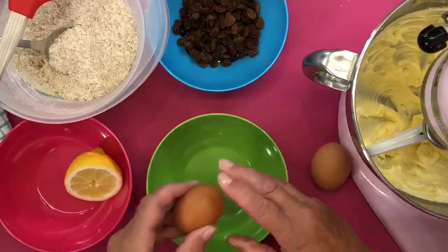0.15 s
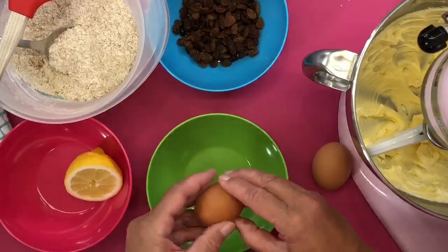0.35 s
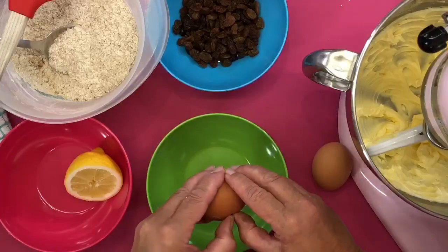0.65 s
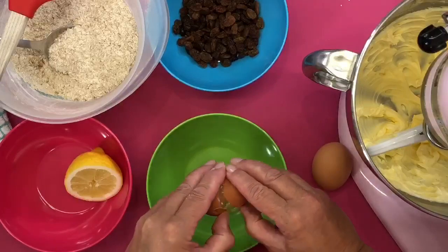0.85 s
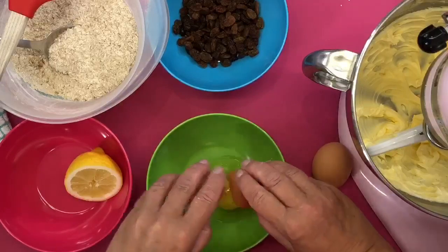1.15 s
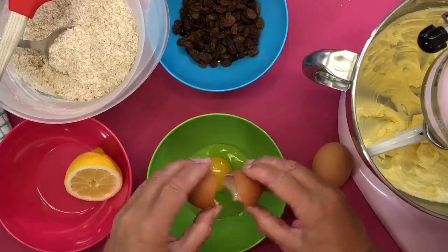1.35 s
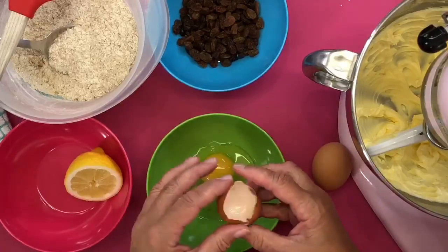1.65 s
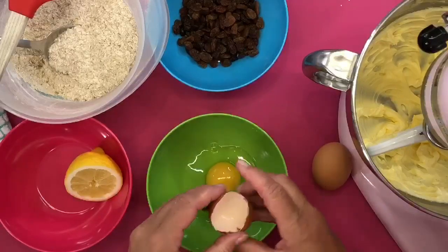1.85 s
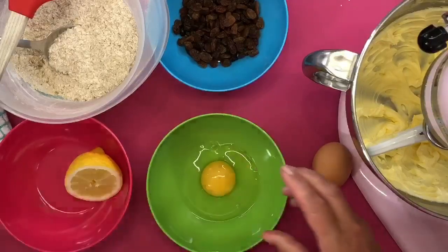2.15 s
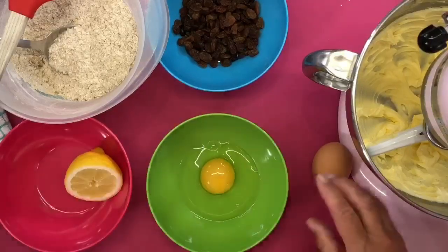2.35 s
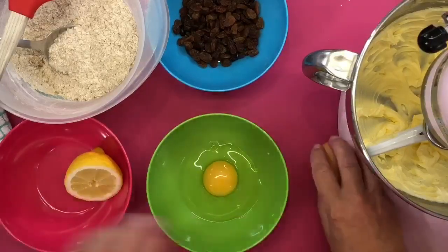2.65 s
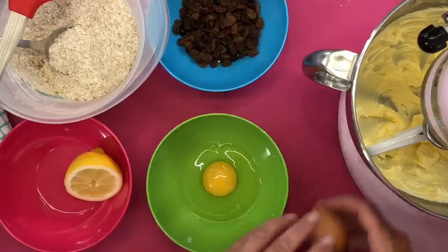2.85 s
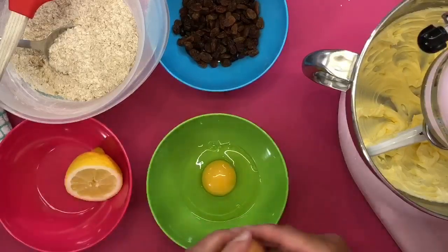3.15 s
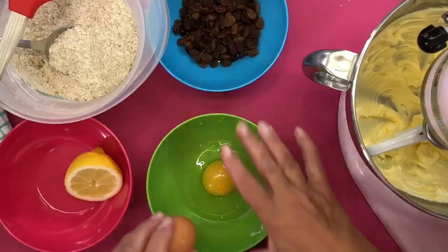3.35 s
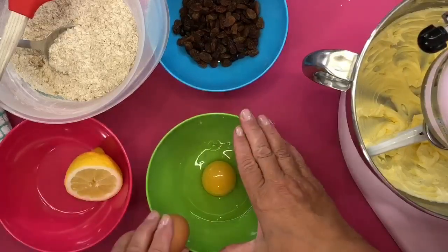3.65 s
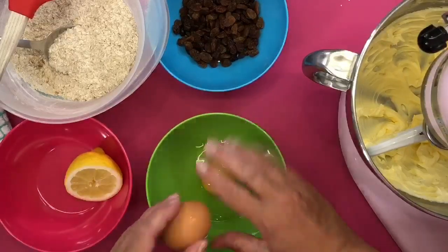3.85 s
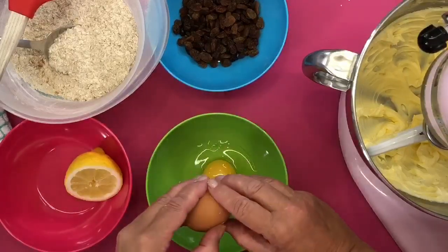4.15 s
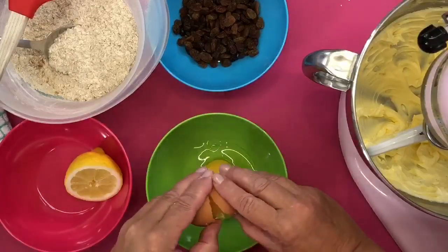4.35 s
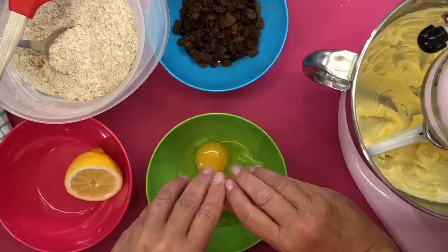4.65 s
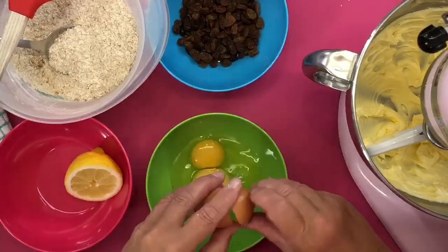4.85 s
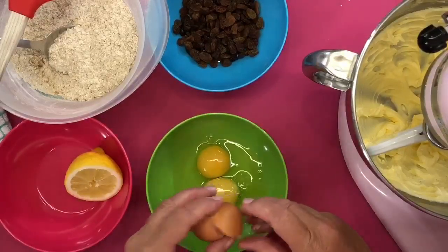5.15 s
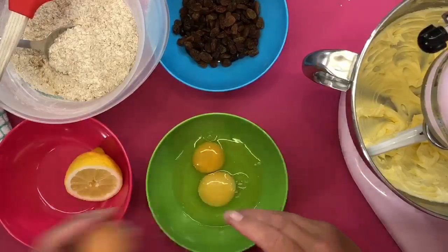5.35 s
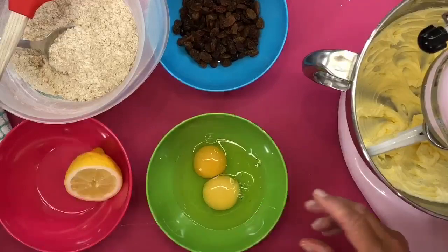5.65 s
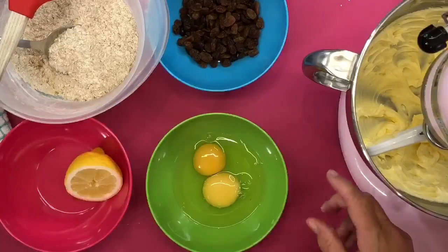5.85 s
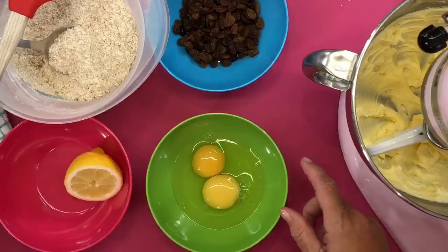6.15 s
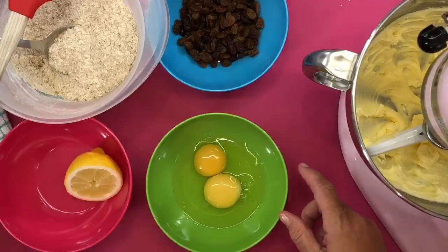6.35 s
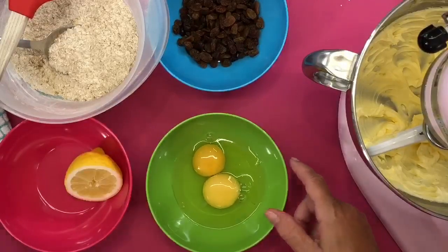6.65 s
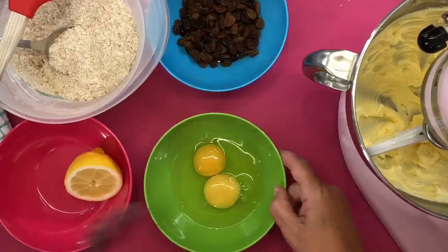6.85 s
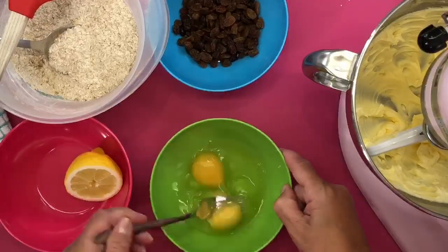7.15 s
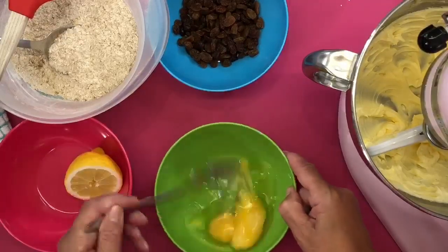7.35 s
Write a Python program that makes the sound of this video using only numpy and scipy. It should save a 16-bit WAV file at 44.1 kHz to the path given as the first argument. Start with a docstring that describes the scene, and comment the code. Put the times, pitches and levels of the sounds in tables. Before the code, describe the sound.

Eggshells crack crisply and wetly in a kitchen, empty shells drop loudly into a dish, and a fork scrapes, lifts and ticks against a bowl.

```python
"""Two eggs are opened close by: a knock on a hard edge, small snaps, then the empty shell drops into a dish.
Of the first egg's knock only the dying end is heard. Each snap is a bright tick plus the ring of a hollow
shell, with splinter crackle and short pops around it; knocks and landings are bursts of tiny contacts.
Then a fork is dragged, lifted and beaten against a bowl: damped sines for its tines and for the bowl.
Behind it all lie filtered noise, the slowly beating hum of two motors and a far airy whirr."""
import sys
import numpy as np
from scipy import signal
from scipy.fft import rfft, irfft, next_fast_len
from scipy.io import wavfile

SR = 44100
rng = np.random.default_rng(int(sys.argv[2]) if len(sys.argv) > 2 else 0)


def to_wav(s):
    """Save 16-bit WAV."""
    ch = np.atleast_2d(s).T  # columns
    pcm = np.round(np.clip(ch, -1, 1) * 32767)  # PCM
    wavfile.write(sys.argv[1], SR, pcm.astype(np.int16))


N = 330309
LEAD = SR // 4   # samples before time zero, so that earlier sounds can still be dying away
CUTOFF_HZ = 16000   # top of the whole sound

# Hard contacts. Each row: start in seconds, level in dB, fading time in seconds of the tiny contacts that
# follow (at least 0.001 is used), and their level in dB relative to the first contact.
# Eggs knocked on the edge; the first row lies before time zero
KNOCKS = [(-.135, -11.5, 0.0033, 3), (3.6295, -10.5, 0.003, 4), (3.6328, -10, 0.053, -4.5),
          (3.708, -47, 0.0076, -3)]
# First shell landing flat in the dish
FIRST_SHELL = [(2.436, -36, .002, -8.5), (2.448, -38, 0.013, 5), (2.4592, -0.5, 0.0026, -0.5),
               (2.4653, -8, .005, 3.5), (2.548, -34, .004, -9)]
# Second shell tumbling onto the first
SECOND_SHELL = [(5.8403, -34, 0.0067, 13), (5.848, -20, 0.0061, -9), (5.8838, -15.5, 0.00707, 7.5),
                (5.8885, -7.5, 0.014, -27), (5.988, -24.5, 0.015, 4), (6.123, -50.5, 0.014, 14)]
# Fork found on the table and lifted off
FORK_LIFT = [(6.122, -47, 0.051, 11), (6.4055, -20, 0.018, 13.3), (6.416, -22.5, 0.016, 7.7),
             (6.782, -46, 0.027, 4.2)]

# Fork strokes on the bowl. Each row: start in seconds, tines in dB, bowl in dB, brightness in dB per octave.
STROKES = [(7.1175, -23, -55, -0.5), (7.16, -44.5, -61, 18), (7.2784, -24, -35, 4), (7.369, -52, -64, 8),
           (7.427, -22, -17.5, 2.5), (7.478, -30.5, -49, 3)]
# A tine brushed as the hand finds and lifts the fork. Each row: start in seconds, level in dB.
BRUSHES = [(6.178, -56), (6.406, -50)]
# Shell breaking. Each row: start in seconds, level in dB, pitch of the hollow shell in Hz,
# wetness from 0 to 1, fading time in seconds of the tiny contacts that follow (at least 0.001 is used).
SNAPS = [(.592, -53, 3300, 0.2, .0017), (.8725, -38.5, 2100, 0.17, 0.00074),
         (1.117, -57.5, 6100, 0, 0.0018), (1.1478, -48.5, 2200, 0.07, 0.023), (1.2139, -43, 2620, 0, 0.016),
         (1.2441, -41.5, 2700, 0.43, 0.019), (1.556, -52, 2280, 0.43, 0.019),
         (1.579, -43.5, 2080, .62, .02), (1.6022, -35.5, 2150, 0.8, 0.012),
         (1.6434, -43, 1950, 0.35, 0.017), (1.705, -47.5, 2090, 0.9, .008),
         (1.8267, -53, 2170, 0.26, 0.0037), (2.548, -31, 5000, 0.55, 0.0031), (3.6292, -30, 3700, 0, .003),
         (3.6327, -25.5, 9680, 0, 0.0019), (4.032, -52, 4300, 0.46, 0.0025),
         (4.2195, -57.5, 2390, 0.03, .005), (4.3444, -44, 2800, 0.04, .0045),
         (4.4265, -36.5, 1570, 0.59, 0.001), (4.6343, -51.5, 4300, 0.83, 0.0046),
         (4.9076, -32.5, 1560, .64, .009), (4.9379, -33, 1670, 0.52, 0.014),
         (5.0912, -38.5, 1578, 0.73, 0.0018), (5.119, -50, 1540, 0.3, .01),
         (5.8834, -18, 6600, 0.35, 0.0035)]
# Hollow pops as the eggs are handled. Each row: start in seconds, pitch in Hz, level in dB.
POPS = [(0.596, 3260, -60), (.874, 2060, -40.5), (2.8, 630, -46.5), (4.913, 1450, -29.5),
        (4.995, 1430, -42), (5.325, 1500, -47.5), (5.848, 2000, -22)]
# Fingers holding an egg. Each row: start in seconds, end in seconds, crackle in dB.
GRIPS = [(0, 1.5, -81), (2.77, 2.8, -70), (3.9, 5.2, -86)]
# The fork is dragged to the table's edge: start in seconds, end in seconds.
SLIDE_S = (6.19, 6.405)

# Broad colours of the contacts, snaps, fork ticks and wet splinters.
# Each row: frequency in Hz, relative level in dB per Hz.
KNOCK_COLOUR = [(40, -58.5), (80, -6), (160, 11.5), (300, -3), (600, 0), (900, 0.5), (1250, -3),
                (2000, -14), (2700, -9.5), (4400, -23.5), (5800, -8), (8000, -20), (10000, -21),
                (16000, -40)]
FIRST_COLOUR = [(71, -60.5), (120, -28), (246, -10.5), (308, -29), (355, -15), (670, -15), (1120, 1.5),
                (1400, -4.5), (2380, 4.5), (3310, -9), (4680, -15), (5750, -9.5), (7820, -28.5),
                (9400, -15.5), (16000, -41.5)]
SECOND_COLOUR = [(120, -51), (200, -15), (289, -20), (709, -10.5), (806, -19), (986, -9.5), (1420, -11.5),
                 (1650, 2), (2650, -3), (3250, 2.5), (3760, -10.5), (5420, -8.5), (16000, -35)]
LIFT_COLOUR = [(71, -62), (120, -18), (136, -10), (188, -21), (301, -34), (473, -5.5), (535, -12.5),
               (892, 1), (1010, -8.5), (1550, -4), (3050, -10), (11500, -17.5), (16000, -37.5)]
SNAP_COLOUR = [(300, -32), (1200, -4), (2500, 6), (4500, 1.5), (7000, 0), (10000, 2), (13000, 0),
               (16000, -21)]
TICK_COLOUR = [(300, -1.5), (1200, -19.5), (4000, -4), (6000, 6.5), (10000, -4), (16000, -10.5)]
CRACKLE_COLOUR = [(500, -29.5), (1400, 8.5), (2300, -2), (4500, 1.5), (9000, -13), (16000, -17.5)]

# Ringing tones (modes) of the struck things.
# Each row: pitch in Hz, width in Hz (wider dies faster), relative strength in dB per Hz of width.
KNOCK_MODES = [(177, 33, 3.5), (720, 89, -6.5), (1046, 75, 0), (1160, 102, 5), (1887, 210, -7.5),
               (3585, 190, -11.5), (5780, 340, -12), (6710, 120, -6), (9410, 1200, -27.5)]
FIRST_MODES = [(1095, 76, -11), (1684, 130, -6), (2157, 90, 0.5), (2240, 13, -3.5), (2898, 99, -20.5),
               (3358, 35, 2), (5410, 140, -12.5), (5490, 80, 0.5), (6457, 200, -8.5), (10200, 400, -16)]
SECOND_MODES = [(1580, 50, -29), (2080, 160, -6), (2620, 130, -6), (3344, 88, 14), (4430, 290, 1.5),
                (5550, 38, 14.5), (6300, 490, -10), (6550, 170, 2)]
LIFT_MODES = [(207, 33, 12.5), (580, 91, 4), (834, 120, 6), (1290, 190, 0), (1537, 110, 14.5),
              (2080, 97, -23), (5100, 100, 4), (12100, 119, -9), (12800, 120, -29.5)]
TINE_MODES = [(1320, 73, -15), (1800, 220, -16), (2487, 91, -2), (2636, 27, 4), (3380, 53, -3),
              (5170, 300, -9.5), (5564, 120, 4.5), (5750, 87, 1.5), (6670, 68, -2.5), (6960, 160, -43),
              (8000, 110, -48), (8930, 68, -10), (10120, 120, -18.5), (11100, 84, -19), (11560, 110, -20),
              (12700, 220, -20), (15000, 250, -27)]
# The bowl; extra damping is applied when the fork beats it
BOWL_MODES = [(1210, 21, 0.5), (1560, 111, 4.5), (1854, 145, 4.5), (2606, 47, 1), (2870, 91, 0.5),
              (3470, 410, -13.5), (6970, 107, 3), (9230, 60, 0.5), (11500, 300, -12)]
# The highest, thin ring of a lightly touched fork
THIN_RING = [(8500, 50, -5), (11220, 30, 3), (12000, 20, -8), (13330, 30, 4)]
# Hollow shell. Each row: multiple of its pitch, relative strength in dB per Hz of width.
HOLLOW_MODES = [(1, 2.5), (1.55, -8.5), (2.42, -18)]

# Colour of the room's own noise. Each row: frequency in Hz, relative level in dB per Hz.
ROOM_TONE = [(15, -41.5), (25, -21), (43, -4), (70, -9), (102, -6), (130, -9), (206, -8.5), (270, -13.5),
             (363, -13.5), (476, -23), (1160, -22), (1840, -31), (7110, -47), (11600, -48.5),
             (16000, -75.5)]
# Loudness of a far appliance. Each row: time in seconds, level in dB.
WHIRR = [(0, -67.5), (1.5, -72), (3.4, -63.5), (4.5, -68), (5.6, -71), (7.49, -63)]
# How long the kitchen echoes. Each row: frequency in Hz, time in seconds to fall by 60 dB.
ROOM_T60 = [(125, 0.18), (400, .5), (1200, 0.44), (2500, 0.6429), (6000, 0.2877), (10000, 0.4),
            (16000, 0.2636)]
# Colour of the kitchen's echoes. Each row: frequency in Hz, relative level in dB.
ROOM_COLOUR = [(100, 4.5), (1000, 0.5), (2500, -4), (6000, -1.5), (10000, -1.5), (16000, -0.5)]
# Bounces off the table top and nearby bowls. Each row: delay in seconds, gain as a plain factor.
NEAR_ECHOES = [(.0006, 0.28), (.0017, -.3), (.0034, .33), (.0059, .36), (.0093, -0.38)]

ROOM_TONE_DB = -55
HUM_HZ, HUM_DB = 100, -63.5   # pitch of the first motor; level of both together
SECOND_MOTOR_DB = -7.5   # relative to the first motor
BEAT_S, IN_STEP_S = 1.53, 1.58   # length of one slow beat, and a moment when the motors agree
SLIDE_DB, SLIDE_SWELL_DB_PER_S = -63, 26   # scrape level at the end, and how fast it swells
GRIP_FADE_DB_PER_S = 500   # before and after each grip
STRAIN_DB = -24   # crackle at the moment of a snap, relative to that snap
STRAIN_RISE_DB_PER_S, STRAIN_FALL_DB_PER_S = 800, 150.5   # before and after the snap
DRY_TICK_DB, WET_TICK_LOSS_DB = 11.5, 21.5   # tick of a dry snap, and what egg white takes from it
DRY_TOP_HZ, WET_TOP_HZ = 14000, 7460   # upper edge of the tick
HOLLOW_Q = 6.3   # pitch of a shell mode divided by its width


def from_db(db):
    """Turn decibels into a gain."""
    return 10 ** (np.asarray(db) / 20)


def rms_one(x):
    """Scale a sound so that its average (rms) level is 1."""
    return x / np.sqrt(np.mean(x ** 2) + 1e-20)


def at_hz(points, hz):
    """Read a table between its rows, along a logarithmic frequency axis."""
    f, value = np.transpose(points)
    return np.interp(np.log(np.maximum(hz, 1)), np.log(f), value)


def in_time(rows):
    """Read a time curve at every sample."""
    return np.interp(np.arange(N) / SR, *np.transpose(rows))


def add(track, s, sound):
    """Mix a sound into a track that begins LEAD samples before time zero."""
    i = max(round(s * SR) + LEAD, 0)
    track[i:i + len(sound)] += sound[:max(len(track) - i, 0)]


def coloured(x, spectrum):
    """Filter a steady noise to a given colour; rms 1."""
    size = next_fast_len(len(x))
    gain = from_db(at_hz(spectrum, np.fft.rfftfreq(size, 1 / SR)))
    shaped = irfft(rfft(x, size) * gain, size)
    return rms_one(shaped[:len(x)])


def click(spectrum, size=4096):
    """The most compact pulse of a given colour that starts at once; peak 1."""
    hz = np.fft.rfftfreq(size, 1 / SR)
    cepstrum = irfft(np.log(from_db(at_hz(spectrum, hz))))
    # folding the cepstrum forward gives minimum phase: energy comes as early as possible
    cepstrum[1:size // 2] *= 2
    cepstrum[size // 2 + 1:] = 0
    pulse = irfft(np.exp(rfft(cepstrum)))
    return pulse / np.abs(pulse).max()


def ring(modes, damping=1, size=8192):
    """A struck body as a sum of dying sines with alternating sign; peak 1."""
    hz, width, db = np.transpose(modes)[:, :, None]
    t = np.arange(size) / SR
    sign = (-1) ** np.arange(len(hz))[:, None]
    strength = from_db(db) * width * sign
    decay = np.exp(-np.pi * width * damping * t)
    sound = (strength * decay * np.sin(2 * np.pi * hz * t)).sum(0)
    return sound / np.abs(sound).max()


def crunch(decay_s, crunch_db, per_s=2500, size=4096):
    """One contact, then a dying shower of tiny ones at random moments."""
    t = np.arange(size) / SR
    hits = rng.random(size) < per_s / SR
    shower = hits * rng.standard_normal(size) * np.exp(-t / max(decay_s, 1e-3))
    # crunch_db compares the shower's energy with that of the first contact
    shower *= from_db(crunch_db) / (np.linalg.norm(shower) + 1e-9)
    shower[0] = 1
    return shower


def kitchen_response(size=24576):
    """Blurred wall echoes: noise in octave bands, each dying at its own rate; energy 1."""
    t, hz = np.arange(size) / SR, np.fft.rfftfreq(size, 1 / SR)
    noise = rfft(rng.standard_normal(size)) * from_db(at_hz(ROOM_COLOUR, hz))
    centres = 125 * 2. ** np.arange(8)
    tail = 0
    for centre, share in zip(centres, np.eye(len(centres))):
        band = irfft(noise * at_hz(np.c_[centres, share], hz))
        tail = tail + band * 10 ** (-3 * t / at_hz(ROOM_T60, centre))
    tail = tail * np.clip((t - .003) / 0.005, 0, 1)   # the walls answer a little later
    return tail / np.linalg.norm(tail)


def in_kitchen(contacts, room_db):
    """A short burst, its bounces off nearby things, and a blurred echo fed by its energy."""
    response = from_db(room_db) * np.linalg.norm(contacts) * kitchen_response()
    direct = (0.00023, 0.98)   # delay in seconds, gain
    for delay_s, gain in [direct] + NEAR_ECHOES:
        i = round(delay_s * SR)
        response[i:i + len(contacts)] += gain * contacts
    return response


def room_tone(whirr_hz, whirr_width_hz):
    """Low rumble and hiss, two motors humming almost in tune, and the airy whirr of an appliance."""
    rumble = from_db(ROOM_TONE_DB) * coloured(rng.standard_normal(N), ROOM_TONE)
    turn = 2 * np.pi * (np.arange(N) / SR - IN_STEP_S)
    second_motor = from_db(SECOND_MOTOR_DB) * np.sin((HUM_HZ + 1 / BEAT_S) * turn)
    motors = np.sin(HUM_HZ * turn) + second_motor
    edges = [whirr_hz - whirr_width_hz / 2, whirr_hz + whirr_width_hz / 2]
    band = signal.butter(2, edges, "band", fs=SR, output="sos")
    air = rms_one(signal.sosfilt(band, rng.standard_normal(N)))
    return rumble + from_db(HUM_DB) * rms_one(motors) + from_db(in_time(WHIRR)) * air


def sliding_fork(contacts_per_s, ring_db):
    """Many tiny contacts scrape along the table and keep the thin ring of the tines awake."""
    t, (start, end) = np.arange(N) / SR, SLIDE_S
    contacts = (rng.random(N) < contacts_per_s / SR) * rng.standard_normal(N)
    scrape = rms_one(signal.oaconvolve(contacts, click(LIFT_COLOUR))[:N])
    tines = rms_one(signal.oaconvolve(contacts, ring(THIN_RING))[:N])
    swell = from_db(SLIDE_DB - SLIDE_SWELL_DB_PER_S * np.abs(end - t))
    swell = swell * (start < t) * (t < end)
    return swell * (scrape + from_db(ring_db) * tines)


def brushed_tines():
    """A light touch wakes only the highest modes of the fork."""
    track = np.zeros(LEAD + N)
    for s, db in BRUSHES:
        add(track, s, from_db(db) * ring(THIN_RING))
    return track[LEAD:]


def beating(tine_damping, bowl_damping, tick_db, chatter_s, chatter_db, room_db):
    """The fork hits the bowl and chatters; each contact ticks and rings both tines and bowl."""
    track, tick = np.zeros(LEAD + N), click(TICK_COLOUR)
    hz, width, db = np.transpose(TINE_MODES)
    for s, tines_db, bowl_db, tilt_db in STROKES:
        tines = np.c_[hz, width, db + tilt_db * np.log2(hz)]   # a sharper contact favours the high modes
        body = from_db(tines_db) * ring(tines, tine_damping)
        body += from_db(bowl_db) * ring(BOWL_MODES, bowl_damping)
        body[:len(tick)] += from_db(tines_db + tick_db) * tick
        chatter = in_kitchen(crunch(chatter_s, chatter_db), room_db)
        add(track, s, signal.fftconvolve(chatter, body))
    return track[LEAD:]


def table_thud(s, db, hz, width_hz):
    """The knock passes through the hand into the table top, which answers with a low thud."""
    track = np.zeros(LEAD + N)
    add(track, s, from_db(db) * ring([(hz, width_hz, 0)]))
    return track[LEAD:]


def blows(contacts, colour, modes, ring_db, room_db):
    """Crunching contacts drive a body, which answers with a broad clack and its ringing modes."""
    body, clack = from_db(ring_db) * ring(modes), click(colour)
    body[:len(clack)] += clack
    track = np.zeros(LEAD + N)
    for s, db, decay_s, crunch_db in contacts:
        drive = in_kitchen(crunch(decay_s, crunch_db), room_db)
        add(track, s, from_db(db) * signal.fftconvolve(drive, body))
    return track[LEAD:]


def pops(swell_s):
    """A pocket of air swells into a short note and dies."""
    track, t = np.zeros(LEAD + N), np.arange(SR // 20) / SR
    swell = t / swell_s * np.exp(1 - t / swell_s)
    for s, hz, db in POPS:
        add(track, s, from_db(db) * swell * np.sin(2 * np.pi * hz * t))
    return track[LEAD:]


def strain():
    """Load on a held shell, as a gain: a light grip, and a swell around each snap within that grip."""
    t, load = np.arange(N) / SR, np.zeros(N)
    for start, end, grip_db in GRIPS:
        outside_s = np.abs(t - np.clip(t, start, end))
        load += from_db(grip_db - GRIP_FADE_DB_PER_S * outside_s)
        for s, db, *_ in SNAPS:
            if start < s < end:
                away_db = np.maximum(STRAIN_RISE_DB_PER_S * (s - t), STRAIN_FALL_DB_PER_S * (t - s))
                load = np.maximum(load, from_db(db + STRAIN_DB - away_db))
    return load


def shell_crackle(per_s, size_spread_db):
    """Tiny splinters of random size give way under the thumbs, louder as the strain grows."""
    sizes = from_db(size_spread_db * np.minimum(rng.exponential(1, N), 4))
    grains = (rng.random(N) < per_s / SR) * sizes * rng.choice([-1, 1], N)
    crackle = signal.oaconvolve(grains, click(CRACKLE_COLOUR))[:N]
    return strain() * rms_one(crackle)


def shell_snaps(hollow_db, crunch_db, splinters_per_s, room_db):
    """Each break is a bright tick, weaker and duller when wet, that also rings the hollow of the shell."""
    track, tick = np.zeros(LEAD + N), click(SNAP_COLOUR)
    for s, db, hz, wetness, decay_s in SNAPS:
        top_hz = DRY_TOP_HZ * (WET_TOP_HZ / DRY_TOP_HZ) ** wetness
        dulling = signal.butter(2, top_hz, fs=SR, output="sos")
        small_radiator = signal.butter(2, hz / 2, "high", fs=SR, output="sos")   # a shell gives little bass
        modes = [(k * hz, k * hz / HOLLOW_Q, mode_db) for k, mode_db in HOLLOW_MODES if k * hz < CUTOFF_HZ]
        body = from_db(hollow_db) * signal.sosfilt(small_radiator, ring(modes))
        tick_gain = from_db(DRY_TICK_DB - WET_TICK_LOSS_DB * wetness)
        body[:len(tick)] += tick_gain * signal.sosfilt(dulling, tick)
        fracture = in_kitchen(crunch(decay_s, crunch_db, splinters_per_s), room_db)
        add(track, s, from_db(db) * signal.fftconvolve(fracture, body))
    return track[LEAD:]


def scene():
    """All sources in one kitchen, each with its own share of room echo."""
    out = room_tone(whirr_hz=1160, whirr_width_hz=220)
    out += beating(tine_damping=1.0, bowl_damping=1.85, tick_db=2.5, chatter_s=0.0019, chatter_db=-2.5,
                   room_db=-1.5)
    out += blows(FORK_LIFT, LIFT_COLOUR, LIFT_MODES, ring_db=-18.5, room_db=-3.5)
    out += blows(KNOCKS, KNOCK_COLOUR, KNOCK_MODES, ring_db=-2.5, room_db=-3.0)
    out += blows(FIRST_SHELL, FIRST_COLOUR, FIRST_MODES, ring_db=-9.5, room_db=-6.0)
    out += blows(SECOND_SHELL, SECOND_COLOUR, SECOND_MODES, ring_db=-7.5, room_db=-0.5)
    out += shell_snaps(hollow_db=1, crunch_db=3.5, splinters_per_s=1900, room_db=-2.5)
    # these small sounds share one room echo
    small = sliding_fork(contacts_per_s=1200, ring_db=-17) + brushed_tines()
    small += table_thud(s=3.631, db=-28.0, hz=177, width_hz=32)
    small += pops(swell_s=0.0018) + shell_crackle(per_s=180, size_spread_db=3.0)
    out += signal.oaconvolve(small, in_kitchen(np.ones(1), room_db=-4.5))[:N]
    return out[None]


def record(dry):
    """Loud peaks are gently rounded; the deepest bass and the top are cut."""
    top = 1.1   # the level that peaks can only approach
    low_pass = signal.ellip(10, .1, 80, CUTOFF_HZ, fs=SR, output="sos")
    low_cut = signal.butter(8, 44, "high", fs=SR, output="sos")
    rounded = top * np.tanh(dry / top)
    return signal.sosfilt(np.vstack([low_cut, low_pass]), rounded)


dry = scene()
out = record(dry)
to_wav(out)
```